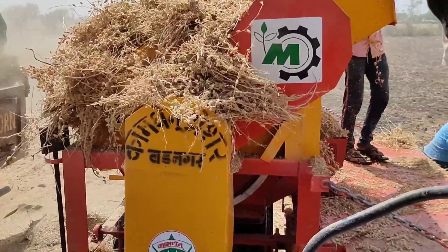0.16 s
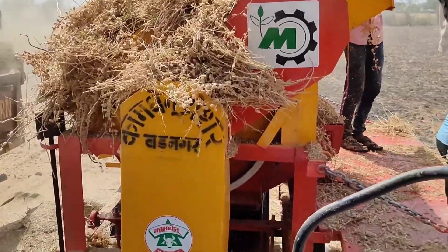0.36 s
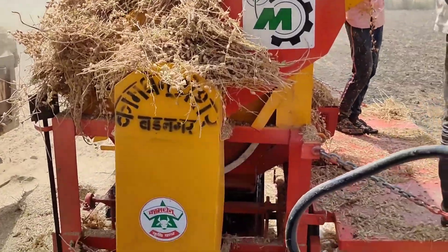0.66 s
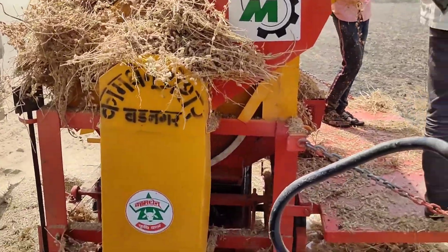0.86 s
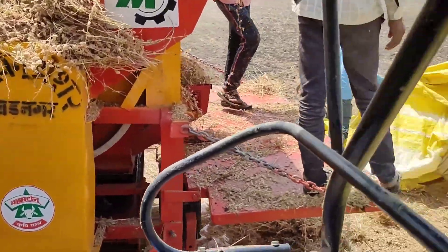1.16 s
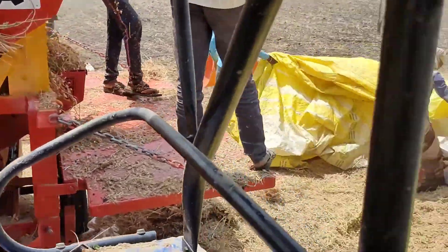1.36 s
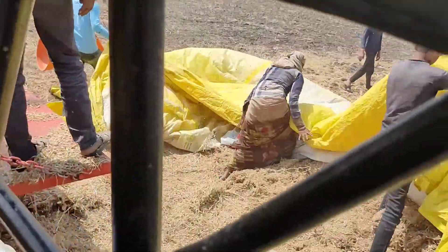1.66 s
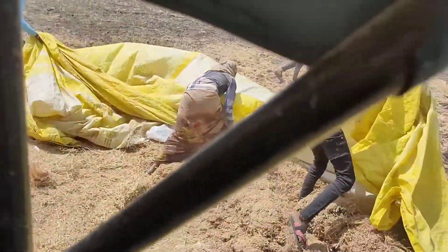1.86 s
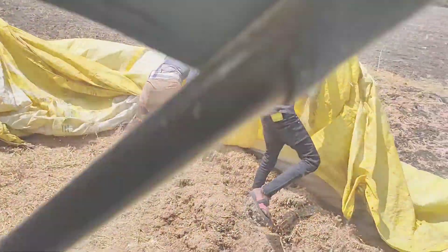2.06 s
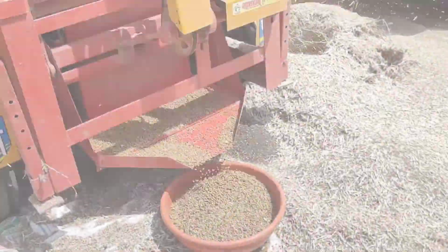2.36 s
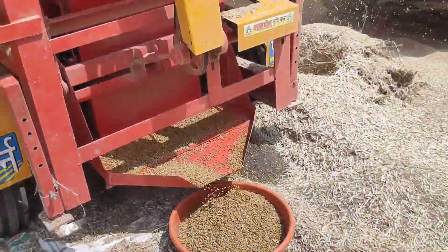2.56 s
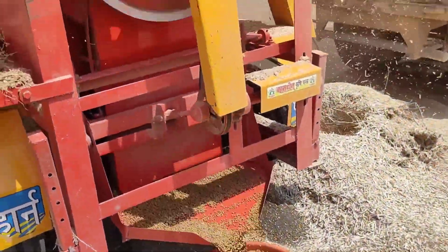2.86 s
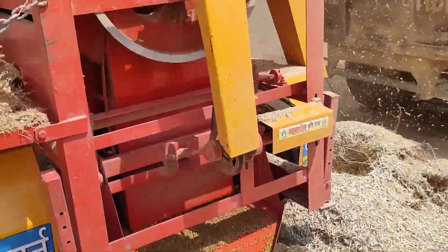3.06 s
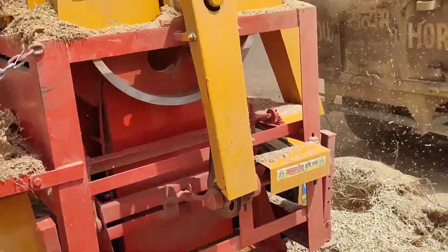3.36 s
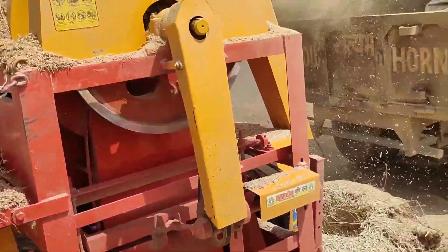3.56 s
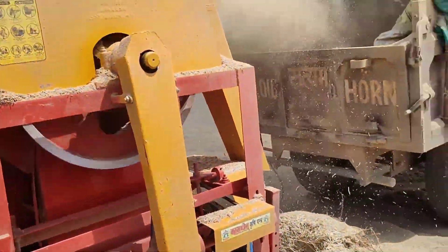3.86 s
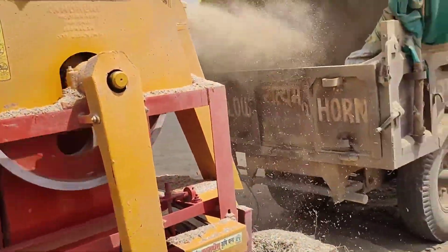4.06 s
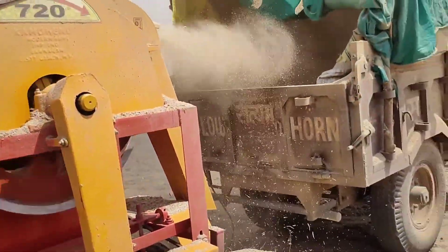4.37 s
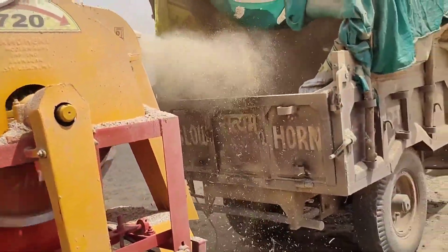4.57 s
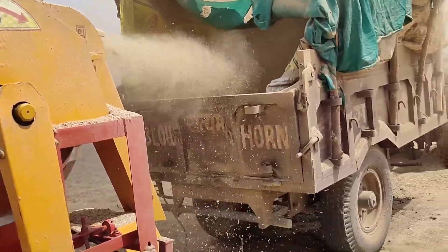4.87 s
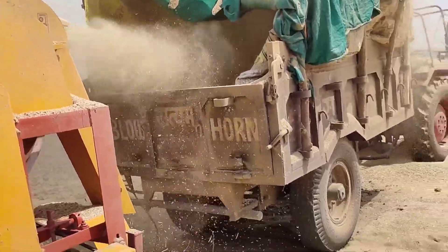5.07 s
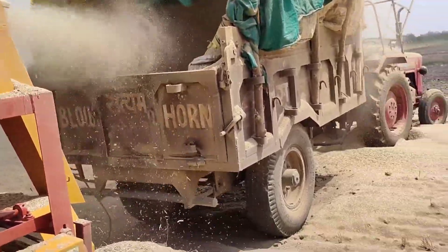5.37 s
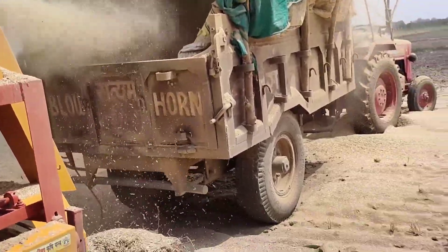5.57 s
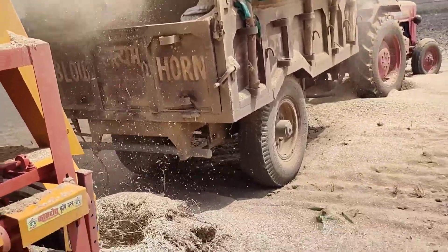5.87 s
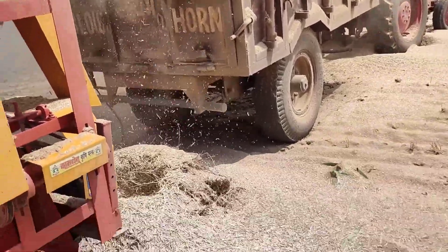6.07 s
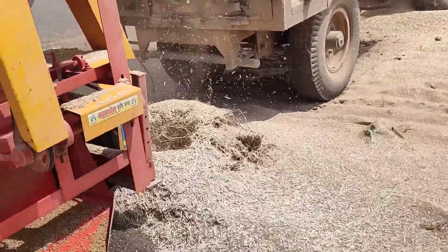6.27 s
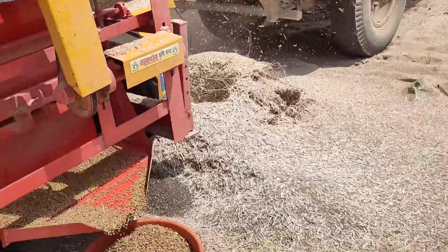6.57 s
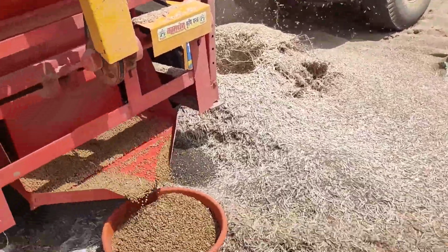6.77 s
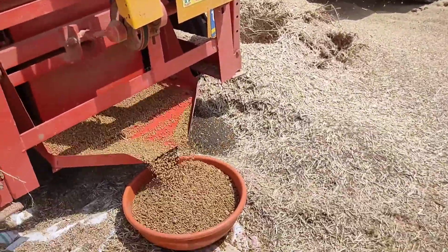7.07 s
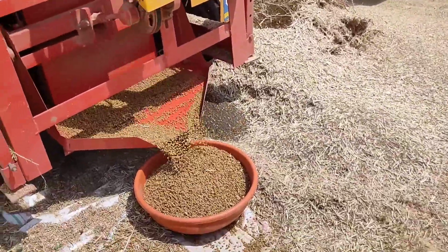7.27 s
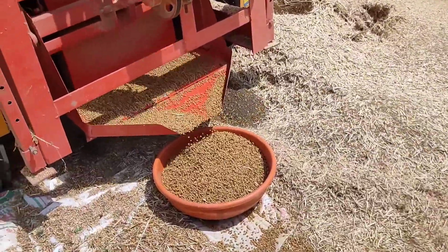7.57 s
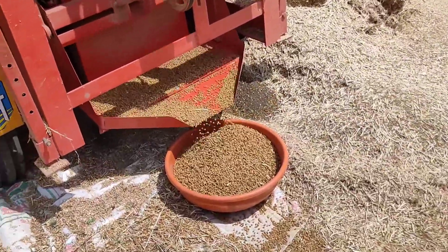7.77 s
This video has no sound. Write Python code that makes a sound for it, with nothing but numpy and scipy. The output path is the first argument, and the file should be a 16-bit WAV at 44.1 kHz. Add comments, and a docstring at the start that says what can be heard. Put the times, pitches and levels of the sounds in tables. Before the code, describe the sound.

From 0 to about 1.8 seconds, a thresher runs hard at close range outdoors: a buzzing low diesel drone, pulsing exhaust, fast beater throb at about 36 beats a second, coarse straw roar, faint hopper ring and crisp chaff hiss. It fades smoothly to silence around 2.25, then the sieve side fades up until about 2.75. The engine is now masked; drum throb, a soft fan hum and a heavier boom about nine times a second sit under bright, grainy hiss. Sieve reversals rattle metallically nearly ten times a second. Seed pours over steel, nearest around 2.8, receding near 4.1, then gradually nearing again until 7.8. Blower hiss is fullest from 3.5 to 5.2; casing ring swells near 5.8. Hiss thins at 7.1 to 7.4, briefly recovers, then eases as the machine keeps running to the end.

```python
"""Tractor-driven thresher in a field

A thresher works under load, heard first from the feed end, near the diesel engine, then, after a fade
through silence, from beside the sieves. Engine, drum and fan are stacks of tones tied to one drum speed.
Straw, chaff and seed are shaped noise. Beater blows and sieve knocks set off the ring of steel parts.
"""
import sys
import numpy as np
from scipy import signal
from scipy.fft import rfft, irfft, next_fast_len
from scipy.io import wavfile
from scipy.ndimage import uniform_filter1d, map_coordinates

SR = 44100
rng = np.random.default_rng(int(sys.argv[2]) if len(sys.argv) > 2 else 0)


def pcm_store(signal):
    """Save signal as 16-bit PCM."""
    levels = np.round(np.clip(np.atleast_2d(signal), -1, 1) * 32767)
    wavfile.write(sys.argv[1], SR, levels.astype(np.int16).T)


N = 349713
T = np.arange(N) / SR  # time of each sample, s

# Drum speed: t/s, turns a second
DRUM_SPEED = [(0.0, 8.989), (2.1, 9.038), (2.4, 8.936), (3.3, 8.845), (4.5, 8.901), (5.7, 8.927),
              (6.8, 8.827), (7.9, 8.814)]
# Chaff hiss at the feed end, before an even lift: t/s, level/dB
FEED_HISS_LEVEL = [(0.0, -27), (0.12, -23.5), (0.146, -25.5), (1.3, -26), (1.75, -28)]
# Hiss of chaff from the blower, before an even lift; it sags when the feed runs thin: t/s, level/dB
BLOWER_LEVEL = [(2.39, -23), (2.41, -22.5), (2.75, -25.5), (2.93, -22.5), (3.45, -23.5), (3.55, -21.5),
                (5.2, -21), (6.7, -23.5), (7.04, -23), (7.1, -27), (7.44, -27), (7.5, -24), (7.9, -26.5)]
# Seed pouring from the spout, louder when near; only its rise and fall is used: t/s, level/dB
SPOUT_LEVEL = [(2.8, -33.5), (4.12, -36.5), (7.8, -33), (7.9, -33.5)]
# Ring of the casing panels, before an even lift; it swells with a heavier load: t/s, level/dB
CASING_LEVEL = [(2.8, -42.5), (4.3, -44), (5.3, -42.5), (5.85, -39.5), (6.1, -44.5), (7.9, -42.5)]

# Tones of a turning part; the levels count against each other
# Engine: multiple of the crankshaft speed, level/dB
ENGINE_TONES = [(1, -22), (2, 0.5), (3, -17), (4, 2), (5, -11.5), (6, -5), (7, -11), (8, -10), (9, -8.5),
                (10, -1), (11, -7), (12, -6), (13, -11.5), (14, -7.5), (15, -17), (16, -11), (17, -8),
                (18, -14)]
# Drum at the feed end: multiple of the beater rate, level/dB
FEED_THROB_TONES = [(1, -31), (2, -1), (3, 2), (4, -45), (5, -12.5)]
# Drum beside the sieves: multiple of the drum speed, level/dB
SIDE_THROB_TONES = [(4, 3), (5, -12.5), (6, -25), (8, 5), (9, -20), (12, -13.5), (20, -16)]
# Winnowing fan: multiple of the fan speed, level/dB
FAN_TONES = [(1, -6), (2, -1.5), (3, 1.5)]

# The four beaters of the drum: beater number, strength level/dB
BEATER_STRENGTH = [(0, 0), (1, -10), (2, -14), (3, -6)]
# The sieve knocks at both ends of its travel: share of the stroke, strength level/dB
SIEVE_STROKE = [(.275, -7), (.67, 0)]

# Ringing steel parts: f/Hz, width/Hz, level/dB; the levels count against each other
# Smaller sheets of the drum housing: f/Hz, width/Hz, level/dB
HOUSING_SHEETS = [(173, 30, -6), (232, 17, -7), (283.9, 7, -3), (318.7, 12, -4.5), (352, 17, -8)]
# Large side plate of the drum housing: f/Hz, width/Hz, level/dB
SIDE_PLATE = [(255, 45, 0)]
# Casing panels rung by the straw: f/Hz, width/Hz, level/dB
CASING_PANELS = [(440, 45, -1), (515, 35, 0), (922, 25, -5), (982, 55, 2), (1035, 30, -3), (1330, 60, -6),
                 (1460, 45, -5), (1575, 50, -3), (2090, 80, -11)]
# Seed tray: f/Hz, width/Hz, level/dB
SEED_TRAY = [(748, 77, 0.5), (1513, 100, -7)]
# Feed hopper: f/Hz, width/Hz, level/dB
FEED_HOPPER = [(416, 10, 3.5), (471, 5.7, 7.5), (662, 60, -0.5), (855, 19, -4), (1158, 11, 0),
               (1220, 55, -5.5), (1426, 33, 0.5), (1923, 44, -5.5), (2465, 46, -8.5)]
# Sieve frame: f/Hz, width/Hz, level/dB
SIEVE_FRAME = [(1200, 120, -5.5), (1740, 82, -6.5), (2075, 60, -1), (2194, 60, -3), (3470, 90, -4.5),
               (4230, 280, -5.5), (5150, 180, 0)]

# Tone colours of noise: f/Hz, level/dB; only the shape counts
# Straw roaring in the feed opening: f/Hz, level/dB
FEED_ROAR_COLOUR = [(290, -51), (500, 5), (544, -12), (679, -7), (745, -2), (811, 0.5), (913, -0.5),
                    (1380, -0.5), (1640, -5), (2010, -4.5), (2190, -7), (2470, -7), (2680, -8),
                    (3290, -9.5), (3800, -8), (4940, -46), (8360, -120)]
# Engine exhaust: f/Hz, level/dB
EXHAUST_COLOUR = [(74, -25), (125, -14), (140, -4), (189, -1.5), (247, -7), (392, -5), (432, -11),
                  (474, -11.5), (600, -13), (780, -45), (1320, -120)]
# Straw roaring through the casing: f/Hz, level/dB
SIDE_ROAR_COLOUR = [(300, -12), (450, -1), (620, -2), (1000, 5.5), (1200, -1), (1600, 0.5), (2400, -2.5),
                    (3400, -12.5), (5000, 1)]
# Straw tumbling inside the drum housing: f/Hz, level/dB
TUMBLE_COLOUR = [(15, -22), (35, -7.5), (70, -3.5), (130, -3), (180, -2), (255, 2.5), (330, -1.5),
                 (390, -9.5), (600, -16)]
# Chaff and seed at the feed end: f/Hz, level/dB
FEED_HISS_COLOUR = [(1650, -51.5), (2800, -23), (3300, -18), (3870, -11), (4750, -2.5), (5270, -2.5),
                    (6200, 4), (6590, 3.5), (7380, -1), (7800, -9), (8570, -38.5), (11100, -73),
                    (18900, -120)]
# Chaff and seed beside the sieves: f/Hz, level/dB
SIDE_HISS_COLOUR = [(2200, -28), (3000, -23), (4500, -17), (5500, -6.5), (6400, 1.5), (7000, -2),
                    (7600, -6), (7900, -16), (8500, -38), (9500, -76)]
# Seed pouring over the steel spout: f/Hz, level/dB
POUR_COLOUR = [(1800, -22), (2800, -8.5), (3700, -4.5), (4600, -2), (5400, 2.5), (6100, 3), (6700, -8.5),
               (7600, -13), (8000, -19), (8600, -43)]

HEAVY_BEAT = 2.757  # a moment at which the heaviest beater passes, s
CHANGE, FADE = 2.262, 0.5  # change of listening place and length of each fade, s
BEATERS_PER_TURN = 4
CRANK_RATIO = 2.181  # crankshaft turns per drum turn, set by the drive gears
FAN_RATIO = 11 / 3  # fan turns per drum turn, set by the belt
SIEVE_RATIO = .5415  # sieve strokes per drum turn
HOUSING_FOLLOWS = 0.63  # share of the spout's level change that the drum housing follows
RATTLE_S = 0.018  # time for a sieve rattle to die down to about a third, s
TOP_HZ = 8500  # upper limit of the sound, Hz


def amp(db):
    """Turn decibels into a plain multiplier."""
    return 10 ** (np.asarray(db) / 20)


def unit(x):
    """Scale a sound to an average (rms) strength of 1."""
    return x / np.sqrt(np.mean(x ** 2) + 1e-20)


def curve(rows):
    """Join the points of a time table with straight lines, one value per sample."""
    time, value = np.transpose(rows)
    return np.interp(T, time, value)


def wobble(rate):
    """Draw a smooth random curve through `rate` random points a second."""
    points = rng.standard_normal(int(N * rate / SR) + 4)
    return map_coordinates(points, [T * rate])


def filtered(x, response):
    """Change the strength and timing of each frequency as `response` says."""
    m = next_fast_len(N + SR // 2)  # spare room lets a ring die away past the end
    return irfft(rfft(x, m) * response(np.fft.rfftfreq(m, 1 / SR)), m)[:N]


def coloured(x, colour):
    """Shape noise by a tone-colour table, at rms 1."""
    f, db = np.transpose(colour)

    def response(hz):
        return amp(np.interp(np.log(hz + 1), np.log(f), db, left=-120, right=-120))
    return unit(filtered(x, response))


def rung(x, modes):
    """Let a sound ring a steel part: each mode answers near its own frequency; rms 1."""
    def response(f):
        total = 0
        for k, (centre, width, db) in enumerate(modes):
            sign = (-1) ** k  # neighbouring modes push in opposite directions
            peak = 1j * f * width / (centre * centre - f * f + 1j * f * width)
            total = total + sign * amp(db) * peak
        return total
    return unit(filtered(x, response))


def rush(patchy_db):
    """Make noise whose loudness drifts in random patches of time and pitch."""
    z = signal.stft(rng.standard_normal(N), nperseg=512)[2]
    patches = uniform_filter1d(rng.standard_normal(z.shape), size=7, axis=0)
    patches = unit(uniform_filter1d(patches, size=8, axis=1))
    return unit(signal.istft(z * amp(patchy_db * patches), nperseg=512)[1][:N])


def pulsing(cycles, depth_db):
    """Make a gain that peaks once a cycle."""
    return amp(depth_db * np.cos(2 * np.pi * cycles))


def hum(cycles, tones, scatter, waver_db):
    """Add the tones of a turning part; with little scatter they line up as one push a cycle."""
    total = 0
    for multiple, db in tones:
        level = amp(db + waver_db * wobble(6.4))
        total = total + level * np.cos(2 * np.pi * (multiple * cycles + scatter * rng.random()))
    return unit(total)


def engine(crank):
    """The diesel hums at multiples of its crankshaft speed, with slight unevenness in its turning."""
    uneven_crank = crank + 0.0059 * wobble(15)
    return amp(-26.5) * hum(uneven_crank, ENGINE_TONES, scatter=0.99, waver_db=-1.0)


def feed_throb(beats):
    """Passing beaters throb at multiples of their rate."""
    return amp(-23.5) * hum(beats, FEED_THROB_TONES, scatter=0.095, waver_db=-0.5)


def exhaust(crank):
    """Exhaust noise pulses once and four times per crankshaft turn."""
    pulses = pulsing(crank, 0.72) * pulsing(4 * crank, 1.4)
    return amp(-29.0) * unit(coloured(rush(patchy_db=0.3), EXHAUST_COLOUR) * pulses)


def low_shake():
    """Very low noise trembles beneath the other sounds."""
    colour = [(8, -3.5), (40, -3), (110, 2), (170, -12)]  # f/Hz, level/dB
    return amp(-51) * coloured(rng.standard_normal(N), colour)


def feed_straw(beats):
    """Each beater chops the roar of straw in the feed opening and the ring of its hopper."""
    chop = pulsing(beats, 1.0) * pulsing(3 * beats, .6)
    roar = amp(-29.5) * unit(coloured(rush(patchy_db=.7), FEED_ROAR_COLOUR) * chop)
    hopper = amp(-36) * rung(rng.standard_normal(N) * chop, FEED_HOPPER)
    return roar + hopper


def chaff(colour, seeds_a_second, seed_db, flutter_db):
    """Seeds tick on steel over a hiss of chaff; the crop comes through in clumps; rms 1."""
    count = int(seeds_a_second * N / SR)
    strength = rng.standard_normal(count) * amp(1.6 * rng.standard_normal(count))
    ticks = np.bincount(rng.integers(0, N, count), strength, N)
    clumps = amp(flutter_db * (wobble(25) + 2.03 * wobble(70)))
    return unit(clumps * coloured(rush(patchy_db=0.76) + amp(seed_db) * unit(ticks), colour))


def feed_hiss():
    """Chaff and seed hiss at the feed end."""
    hiss = chaff(FEED_HISS_COLOUR, seeds_a_second=1100, seed_db=-6.5, flutter_db=0.27)
    return amp(curve(FEED_HISS_LEVEL) + 2.5) * hiss


def feed_end(turn):
    """The four-cylinder diesel beats against the drum; straw roars in the open hopper."""
    beats = BEATERS_PER_TURN * turn
    crank = CRANK_RATIO * turn
    return engine(crank) + feed_throb(beats) + exhaust(crank) + low_shake() + feed_straw(beats) + feed_hiss()


def side_throb(turn):
    """Each beater shoves a slug of air, giving tones at multiples of the drum speed."""
    return amp(-30.0) * hum(turn, SIDE_THROB_TONES, scatter=.03, waver_db=.3)


def fan(turn):
    """The belt-driven winnowing fan hums at multiples of its own speed."""
    return amp(-37) * hum(FAN_RATIO * turn, FAN_TONES, scatter=1.0, waver_db=2.5)


def housing_blows(turn):
    """Every beater shakes the small sheets; the heaviest makes the side plate boom once a turn."""
    beat = np.floor(BEATERS_PER_TURN * turn).astype(int)
    at = np.flatnonzero(np.diff(beat)) + 1  # samples where a new beater arrives
    blows = np.zeros(N)
    blows[at] = amp(.9 * rng.standard_normal(len(at)))
    strength = amp(np.array(BEATER_STRENGTH)[beat % len(BEATER_STRENGTH), 1])
    boom = rung(rung(blows * strength, SIDE_PLATE), SIDE_PLATE)  # the heavy plate is slow to swell
    # straw dragged along by each blow roughens the sheets
    drag_fade = np.exp(-T[:SR // 10] / 0.011)
    drag = signal.fftconvolve(blows, drag_fade)[:N] * rng.standard_normal(N)
    sheets = unit(rung(blows, HOUSING_SHEETS) + .55 * rung(drag, HOUSING_SHEETS))
    return amp(-36) * (boom + amp(-4) * sheets)


def tumbling_straw(turn):
    """Straw tumbling inside the housing rumbles, pulsing with the drum and its beaters."""
    pulses = pulsing(turn, 1) * pulsing(BEATERS_PER_TURN * turn - .15, 0.72)
    return amp(-33) * unit(coloured(rush(patchy_db=1.1), TUMBLE_COLOUR) * pulses)


def casing_panels(turn):
    """Straw rings the panels in time with the beaters; the ring swells as wads pass."""
    level_db = curve(CASING_LEVEL) + 2 + 1.1 * wobble(6)
    straw = rush(patchy_db=0.0) * pulsing(BEATERS_PER_TURN * turn - .4, 2.8)
    return amp(level_db) * rung(straw, CASING_PANELS)


def casing_roar():
    """Straw roars through the casing as patchy noise."""
    return amp(-36.5) * coloured(rush(patchy_db=2.0), SIDE_ROAR_COLOUR)


def blower_hiss():
    """Chaff hisses as it leaves the blower in uneven puffs."""
    level_db = curve(BLOWER_LEVEL) + 1.32 + .5 * wobble(16)
    return amp(level_db) * chaff(SIDE_HISS_COLOUR, seeds_a_second=4000, seed_db=-10, flutter_db=0.53)


def seed_spout(near_db):
    """Seed pours over the steel spout and rings the tray below the louder hiss."""
    pour = chaff(POUR_COLOUR, seeds_a_second=1500, seed_db=-5, flutter_db=.45)
    # the tray is heard only near the spout, so it falls away faster than the pour
    tray = rung(rng.standard_normal(N), SEED_TRAY)
    return amp(-28.0 + 1.9 * near_db) * pour + amp(-45 + 4.3 * near_db) * tray


def sieve_knocks(turn):
    """A crank throws the sieve to and fro; at each reversal its frame rattles and rings."""
    stroke = SIEVE_RATIO * turn
    strokes_a_second = np.gradient(stroke) * SR
    rattle = 0
    for at, db in SIEVE_STROKE:
        seconds_since_knock = ((stroke - at) % 1) / strokes_a_second
        rattle = rattle + amp(db) * np.exp(-seconds_since_knock / RATTLE_S)
    return amp(-42) * rung(rattle * rng.standard_normal(N), SIEVE_FRAME)


def sieve_side(turn):
    """The engine is screened here: drum, fan, panels, shaking sieve and falling seed take over."""
    near_db = curve(SPOUT_LEVEL) - np.mean(SPOUT_LEVEL, axis=0)[1]
    drum = amp(HOUSING_FOLLOWS * near_db) * (housing_blows(turn) + tumbling_straw(turn))
    straw = casing_panels(turn) + casing_roar()
    seed = blower_hiss() + seed_spout(near_db)
    return side_throb(turn) + fan(turn) + drum + straw + seed + sieve_knocks(turn)


def scene():
    """One drum sets every speed; the first place fades out and the second fades in."""
    turn = np.cumsum(curve(DRUM_SPEED)) / SR
    turn = turn - np.interp(HEAVY_BEAT, T, turn)  # count turns from a pass of the heaviest beater
    fade = (T - CHANGE) / FADE
    first = np.clip(-fade, 0, 1) * feed_end(turn)
    second = np.clip(fade, 0, 1) * sieve_side(turn)
    return (first + second)[None]


def record(dry):
    """Cut the sound off very steeply above its upper limit."""
    return filtered(dry[0], lambda hz: 1 / np.sqrt(1 + (hz / TOP_HZ) ** 160))[None]


dry = scene()
out = record(dry)
pcm_store(out)
```